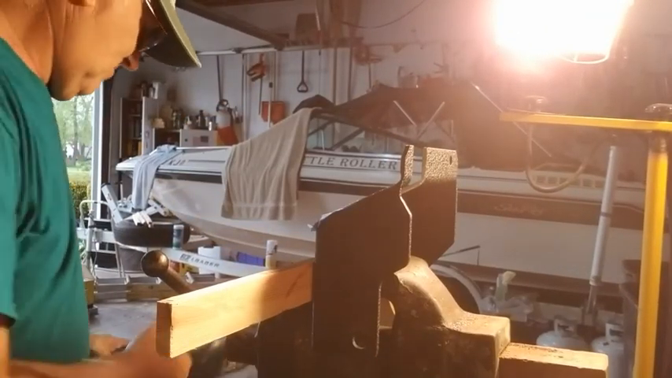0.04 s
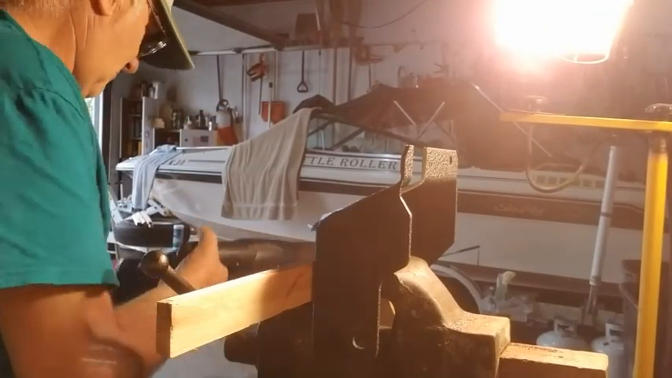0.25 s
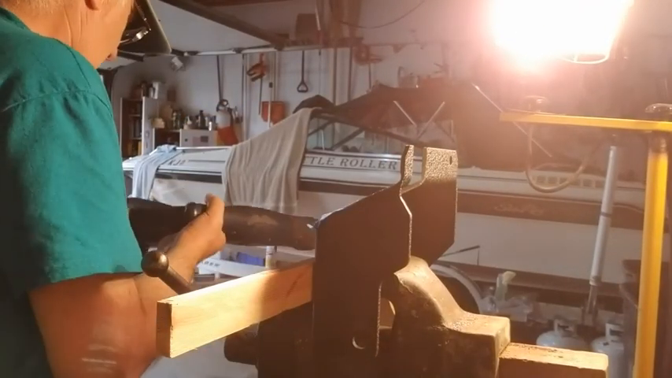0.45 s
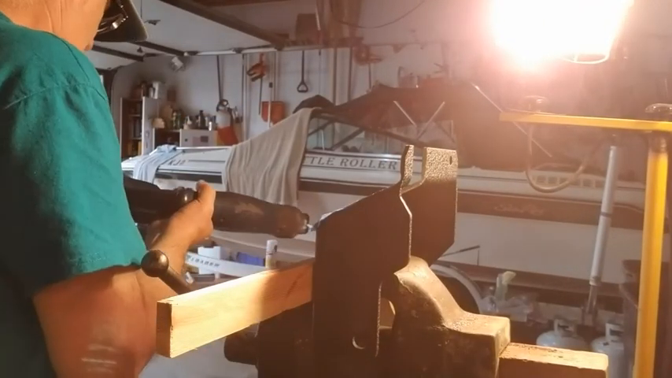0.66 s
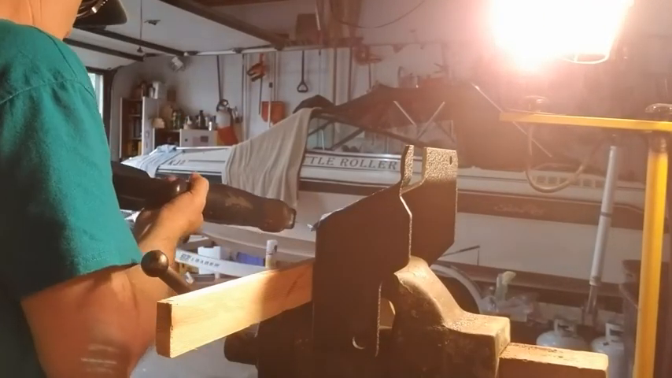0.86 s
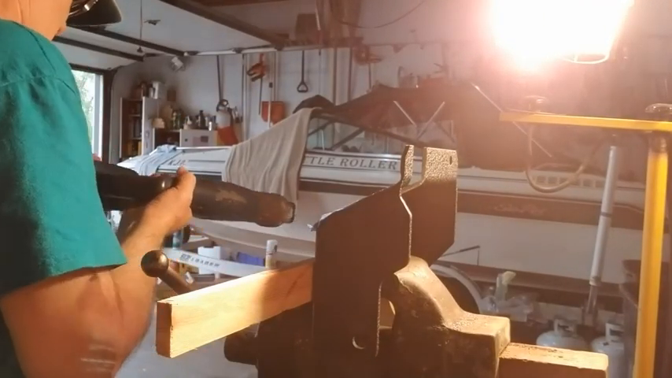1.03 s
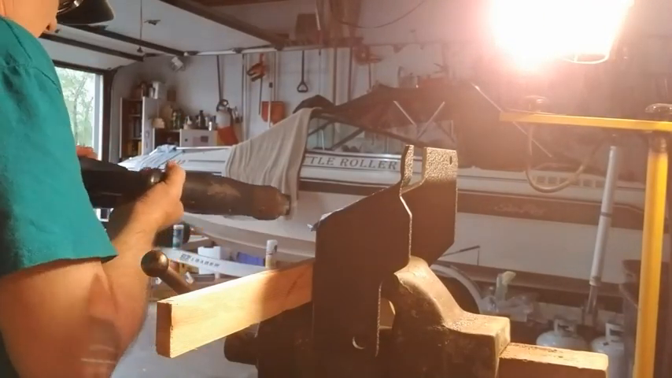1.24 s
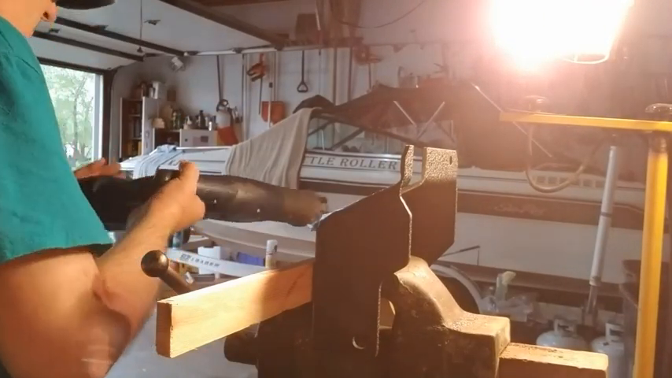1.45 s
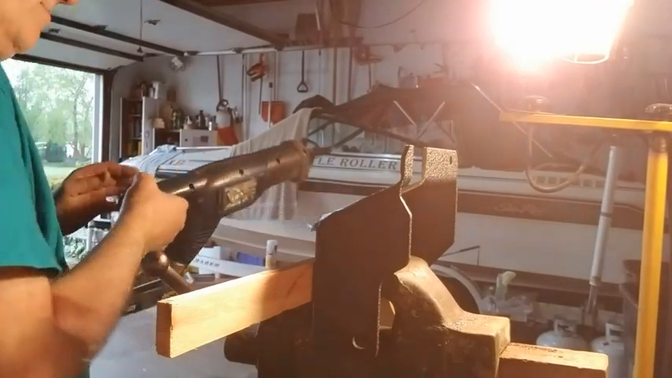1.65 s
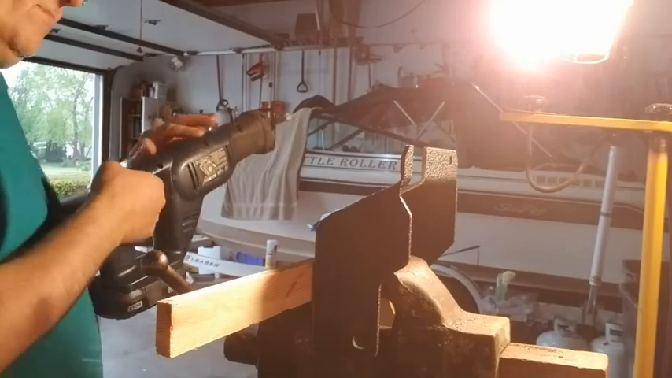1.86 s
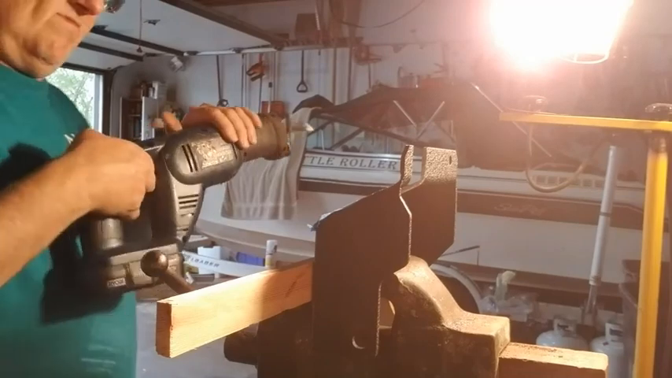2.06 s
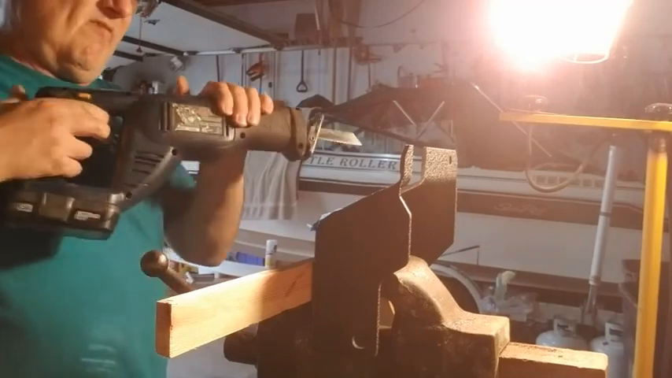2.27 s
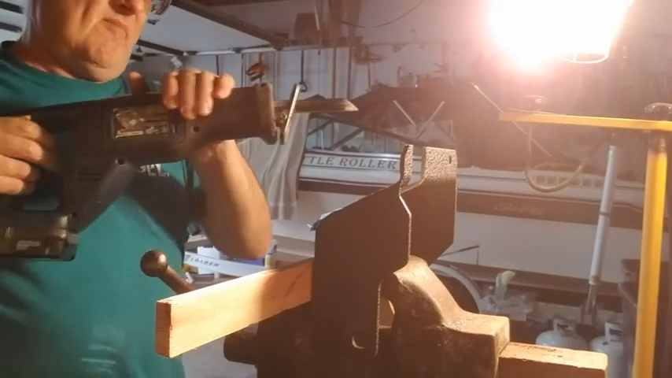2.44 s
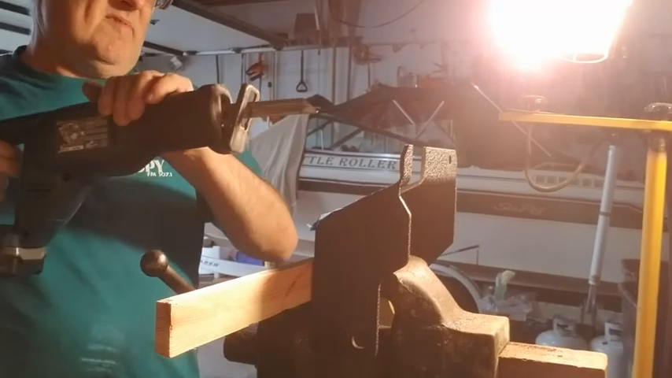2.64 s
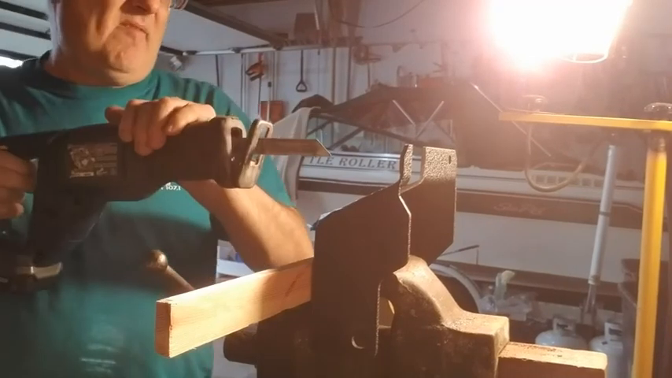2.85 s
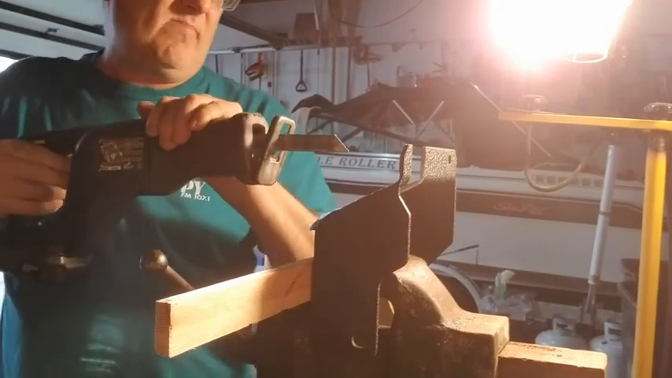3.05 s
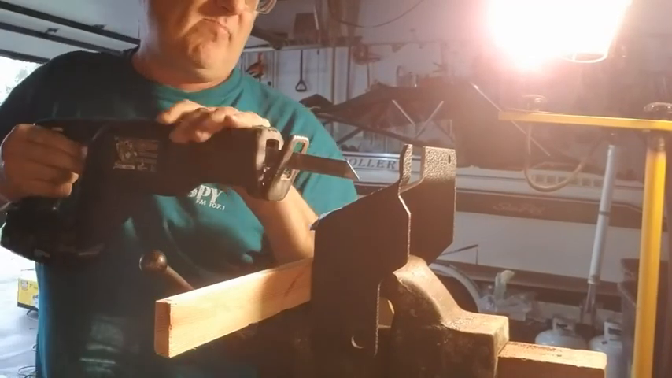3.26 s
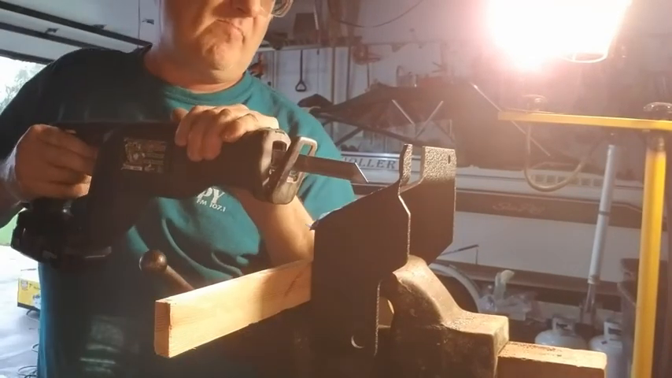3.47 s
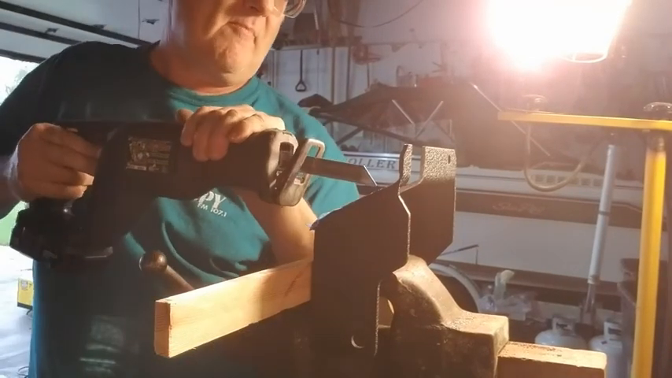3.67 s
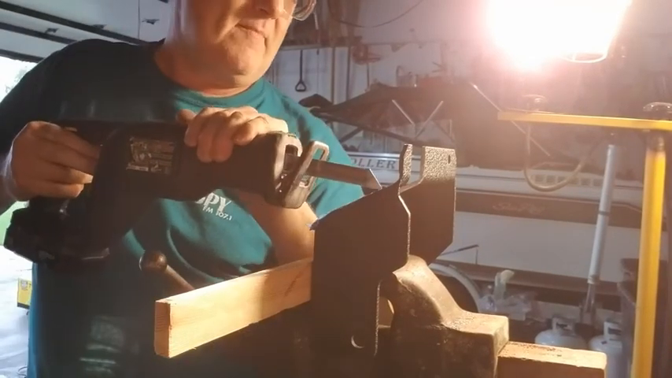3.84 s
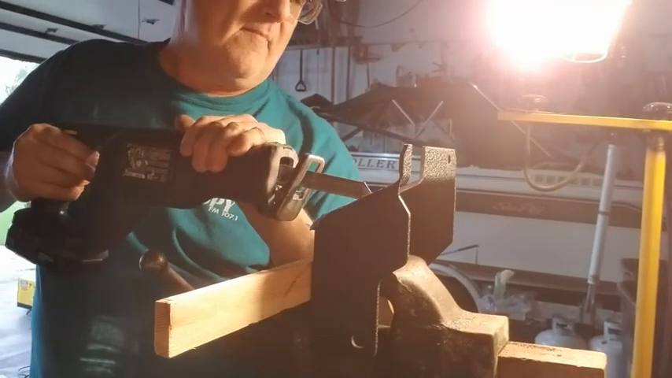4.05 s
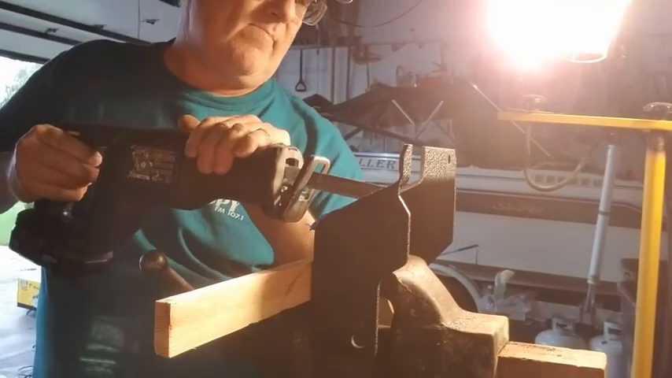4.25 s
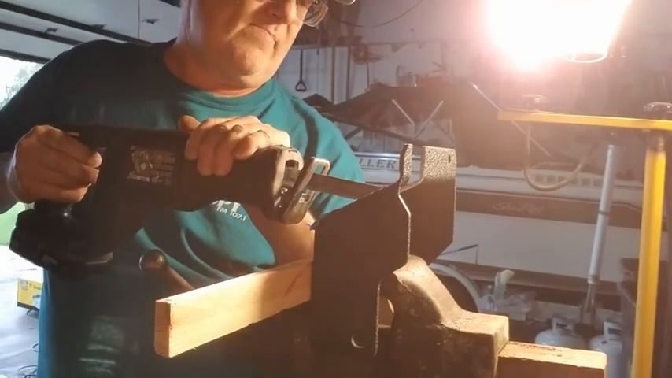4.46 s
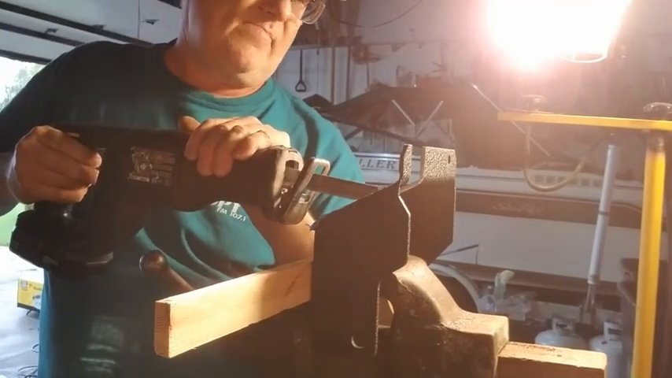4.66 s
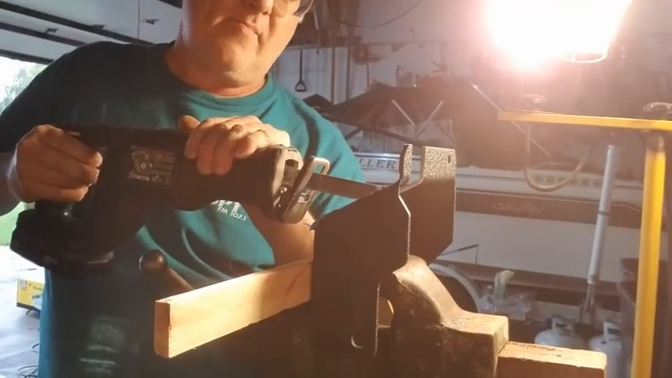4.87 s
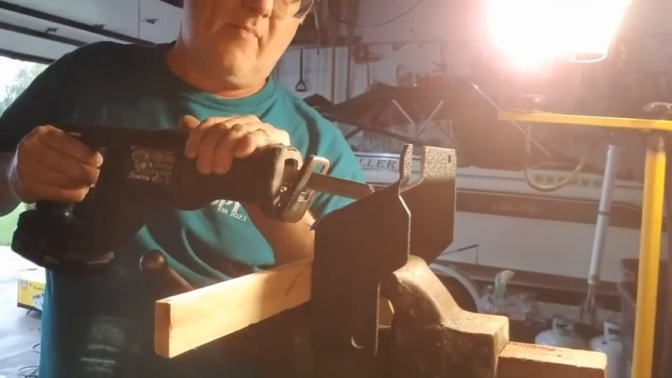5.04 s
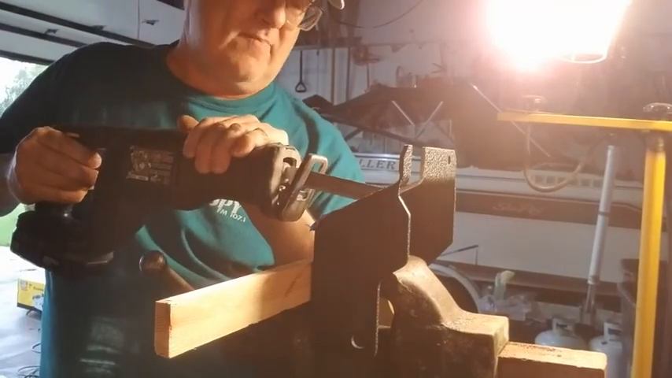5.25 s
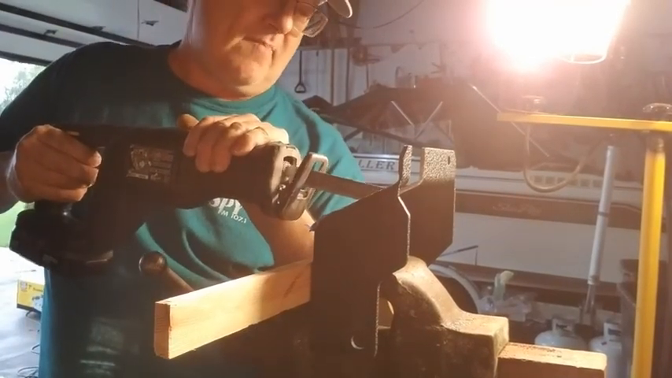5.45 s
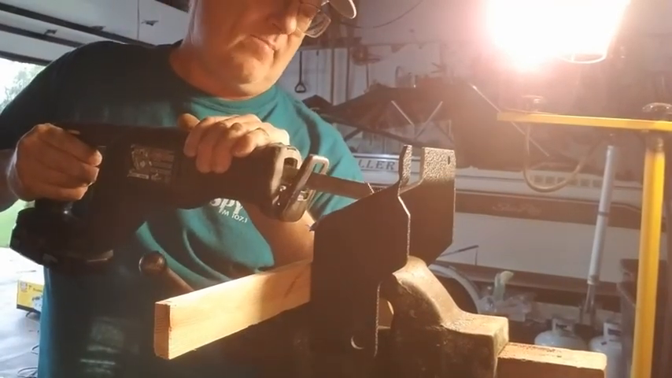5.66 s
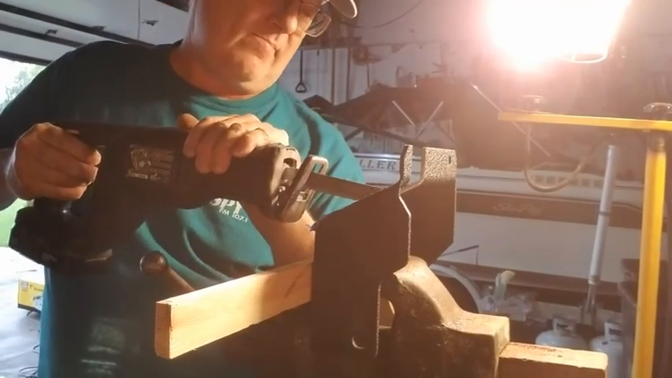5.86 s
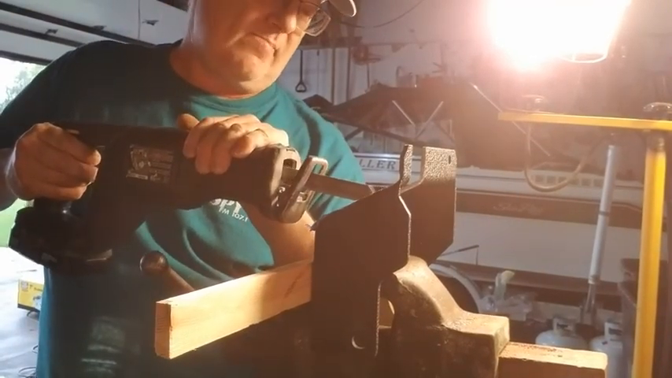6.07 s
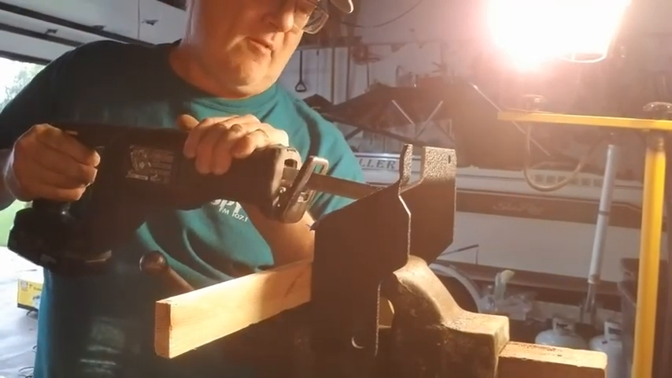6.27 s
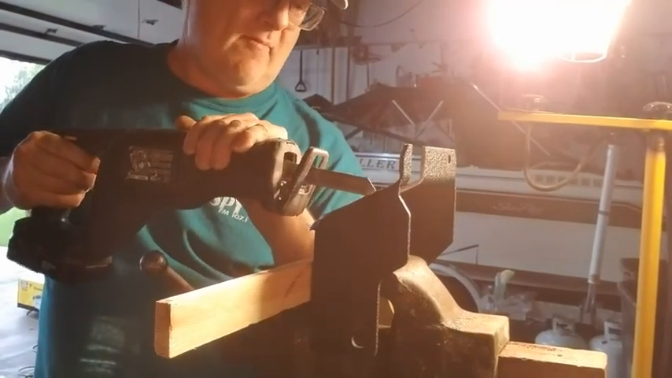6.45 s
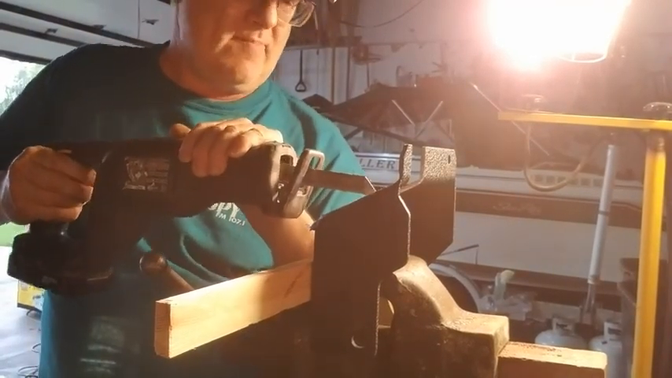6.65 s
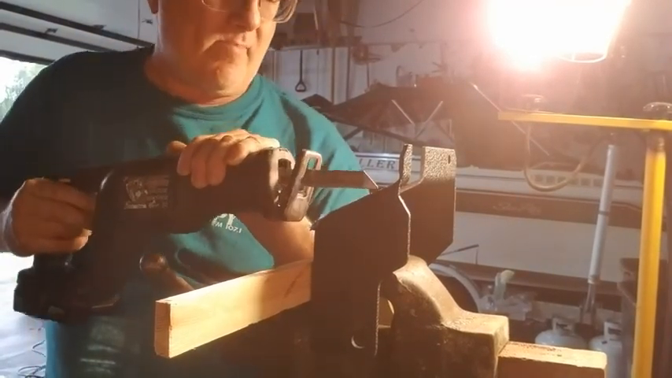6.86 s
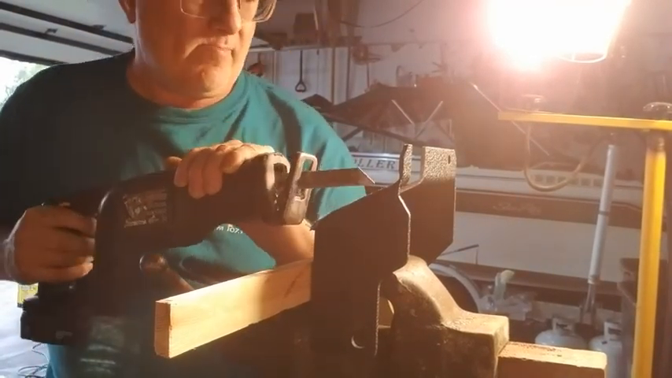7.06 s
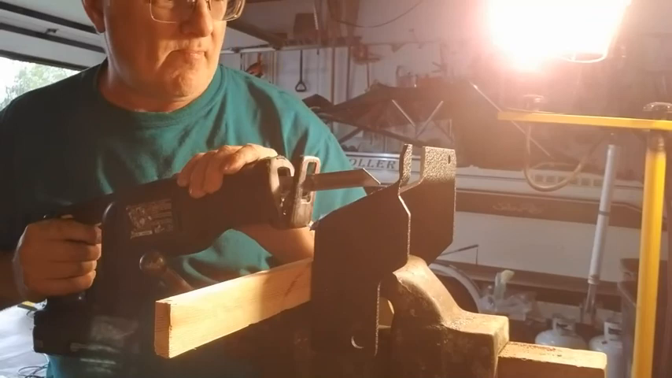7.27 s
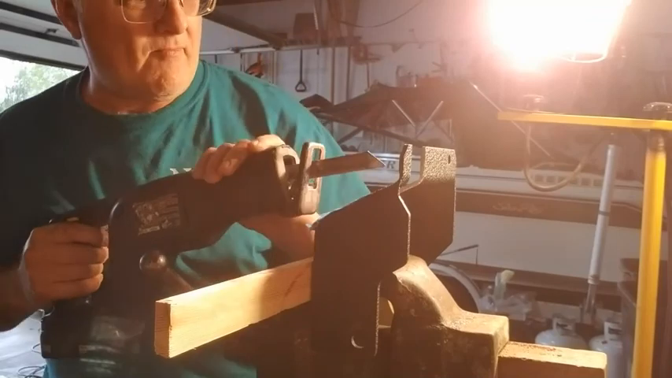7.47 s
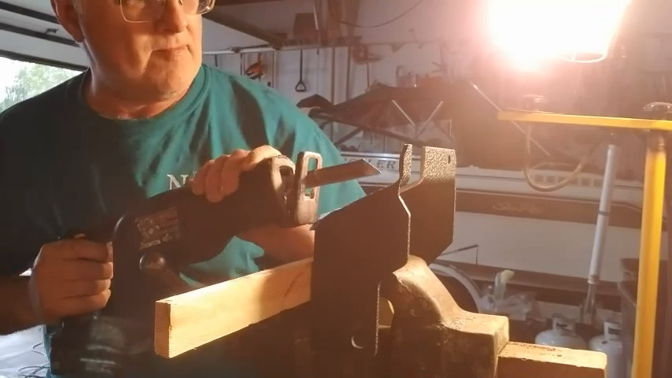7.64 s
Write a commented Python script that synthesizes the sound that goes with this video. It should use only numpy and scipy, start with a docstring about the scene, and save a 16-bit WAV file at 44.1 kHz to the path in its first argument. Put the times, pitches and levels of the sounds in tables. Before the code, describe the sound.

Close stereo sound of a cordless reciprocating saw in a moderately live garage. First come plastic clunks, skin and cloth rubs, and a sharp double snap of the battery catch. A quieter pause holds soft grip noises. The saw starts under strain, clattering at both stroke ends while its blade skates over clamped steel, making it sing unevenly. The motor brakes quickly; the plate rings out, with a few faint taps over low room rumble.

```python
"""In a garage a battery pack is slid onto a cordless reciprocating saw and latched, and the saw is lifted
to a steel plate in a vise. It runs for two seconds: the drive knocks at both ends of each stroke, the
teeth skate over the edge and the plate sings. Hands rustle and tick on the plastic before and after.
Knocks strike damped resonances, scrapes and rustles are shaped noise, the singing plate is two sines."""
import sys
import numpy as np
from scipy import signal
from scipy.fft import rfft, irfft
from scipy.io import wavfile

SR = 44100
rng = np.random.default_rng(int(sys.argv[2]) if len(sys.argv) > 2 else 0)


def to_wav(sig):
    """Store sig (one row per channel, or 1-D mono) as 16-bit WAV at the path in sys.argv[1].

    Samples outside -1..1 are clipped; the rate is SR.
    """
    pcm = np.clip(np.atleast_2d(sig), -1, 1) * 32767
    pcm = np.round(pcm).astype(np.int16)
    wavfile.write(sys.argv[1], SR, pcm.T)  # frames by channels


N = 340011
T = np.arange(N) / SR  # seconds

# Levels throughout are those going into the mix; spectra and resonances are balanced among themselves.

# Crank position. Each row: time in seconds, full back-and-forth strokes completed.
CRANK = [(4.2972, 0), (4.3845, 1), (4.5485, 3), (4.8629, 7), (5.1742, 11), (6.1954, 24), (6.397, 26.5)]
# How hard the teeth bear on the steel. Each row: time in seconds, level in dB.
BITE = [(4.28, -63), (4.39, -39.5), (4.57, -43.5), (4.68, -35.5), (4.82, -45), (4.85, -44), (5.13, -58),
        (5.24, -41.5), (5.37, -54), (5.42, -64), (5.47, -41.5), (5.55, -46), (5.78, -42.5), (5.86, -52.5),
        (5.97, -47.5), (6.11, -54), (6.31, -38), (6.42, -52)]

# Resonances of the steel plate, gearcase, blade and plastic housing, the heavy grip with its battery, the
# gearcase and vents under the running motor, and the battery case (low modes).
# Each row: frequency in Hz, width in Hz, level in dB.
PLATE = [(508, 23, -9.5), (655, 5.8, -6.5), (1265, 9.1, -10), (1447, 8.8, 6.5), (2448, 9.3, 3.5),
         (2738, 13, 2), (4830, 18, -5.5), (6300, 16, -15), (15300, 12, -34)]
GEARCASE = [(135, 110, -19.5), (354, 150, -6), (535, 165, 0), (653, 135, 1.5), (1133, 31, -4.5),
            (1278, 150, -12), (1460, 100, -2.5), (1781, 43, -5.5)]
BLADE = [(5690, 83, 4.5), (8910, 90, 5.5), (10060, 90, -4.5), (11200, 130, -13.5), (12300, 190, -22),
         (13200, 170, 6), (14200, 36, 4.5), (15800, 60, -16), (15440, 700, 8.5)]
HOUSING = [(915, 89, -1.5), (1270, 98, -0.5), (1472, 88, 0), (1676, 330, -0.5), (2077, 140, -0.5),
           (2390, 170, -8.5)]
GRIP = [(367, 140, -9), (535, 116, 0), (640, 100, 2), (785, 62, 4), (1018, 200, -4), (1277, 110, -5),
        (1466, 83, -1)]
CASING = [(549, 36, 11), (645, 57, -9), (967, 76, 4), (1240, 25, -16), (1640, 70, -2), (3000, 120, -30),
          (3400, 110, -2)]
PACK = [(127, 35, -8), (259, 38, -12.5), (369, 39, 3.5), (471, 32, -3)]

# Spectra of loose parts, gears and fan, scraping teeth, the battery latch, clicks on plastic and their top
# end, sliding cloth and skin, their airy hiss, still air, and the low rumble.
# Each row: frequency in Hz, density in dB per Hz.
RATTLE = [(30, -7), (90, -17), (300, -4.5), (620, -3.5), (900, -3.5), (1500, 2.5), (2100, -8), (3300, -4),
          (4500, -13), (7300, -21.5), (9200, -16), (12000, -10.5), (15300, -10), (17000, -26)]
WHIRR = [(30, -40), (140, -22), (300, -10), (550, 4), (950, 6), (1700, -3), (2100, -3.5), (3300, -4.5),
         (4500, -16), (7000, -23.5), (10000, -19), (15000, -14.5)]
SCRAPE = [(100, -6), (300, 9.5), (700, 6.5), (1500, -1.5), (2000, -6), (3200, -2.5), (5000, -1),
          (7300, -14), (10000, -23), (15000, -4)]
LATCH = [(50, -33.5), (130, -14.5), (230, -8.5), (350, -16), (500, -6), (880, 0.5), (1300, -0.5),
         (1900, -3), (2500, -4.5), (4000, -5), (5600, -9), (7500, -15.5), (11000, -9), (15500, -9.5)]
TICK = [(500, -29), (1500, -7), (2700, 1), (4200, -2.5), (6000, -5.5), (8000, -18), (15000, -35.5)]
SPARKLE = [(2000, -47), (6000, -24), (9000, 4), (12000, 9), (15500, 6)]
CLOTH = [(100, -10.5), (300, -11), (550, 1.5), (850, 4), (1600, 0.5), (2800, -3), (5000, -14.5),
         (8000, -40), (15000, -11.5)]
HISS = [(1000, -13), (3000, 6), (5000, 4), (7700, -2.5), (10000, 3), (12500, 5.5), (15500, 0.5)]
AIR = [(15, -37), (25, -6), (82, -3), (141, -6.5), (309, -17.5), (516, -17), (775, -11), (962, -20),
       (4030, -29.5), (5140, -30), (7710, -40), (11600, -26), (16000, -24)]
RUMBLE = [(20, -31.5), (45, -0.5), (70, 3.5), (115, 1.5), (170, -8), (300, -11.5), (900, -42.5)]

# Knocks of the housing. Each row: start in seconds, level in dB, thud and click in dB relative to that
# level, base rattle T60 in seconds, which each layer scales.
KNOCKS = [(0.126, -60.5, -10, 2, 0.045), (0.2252, -48.5, -9, -6, 0.03), (0.4841, -41, 3, -3, 0.038),
          (0.628, -54, 4, -2.5, .04), (0.7093, -35.5, -8, -15.5, 0.041), (0.7238, -51.5, 3, -7, 0.055),
          (0.9558, -38, -7.5, -15, .04), (1.1006, -36.5, -11, -10, .05), (1.219, -43.5, -11.5, -14, .06),
          (1.7634, -67, 18, 13, 0.035), (2.6656, -60.5, 15.5, -0.5, 0.042), (2.6932, -54, 5, -0.5, 0.031),
          (2.836, -46, 3.5, -3.5, 0.062), (2.8473, -45, 1.5, -13, 0.055), (2.976, -57.5, 8, -1, 0.026),
          (3.1988, -50.5, -1, -3.5, 0.084), (3.351, -53, 5, -1.5, 0.048), (3.3614, -39, -5, -18, .04),
          (3.4501, -56.5, 2, -8, .04), (3.8104, -58.5, 5, 6.5, 0.048), (3.946, -56.5, -13, 2.5, .031),
          (3.974, -53, -14.5, -1, .029), (6.7175, -62.5, 5.5, 1, .043), (7.225, -55.5, 6, 1, .04),
          (7.4134, -65, 7.5, -8, 0.043), (7.5394, -56, 13, -3, .036)]
# The battery snapping home. Each row: start in seconds, level in dB, rattle T60 in seconds.
SNAPS = [(1.255, -39, 0.027), (1.2595, -19, 0.019), (1.2616, -19.5, 0.0098), (1.269, -28.5, 0.082)]
# The teeth snag and the plate booms. Each row: centre in seconds, level in dB.
SNAGS = [(4.505, -32), (4.73, -36.5), (6.3, -36)]
# Hands and sleeves slide on the saw. Each row: centre in seconds, half length in seconds, rub in dB, hiss in dB.
SLIDES = [(0.116, 0.26, -57.5, -70.5), (0.268, 0.025, -49.5, -65), (0.68, 0.12, -61.5, -70.5),
          (1.108, 0.16, -57, -69), (1.241, 0.0095, -43, -64), (1.5, 0.082, -61.5, -70.5),
          (2.037, 0.33, -70, -72), (2.5, 0.016, -59, -59), (2.642, 0.037, -56.5, -71.5),
          (2.793, 0.085, -60, -63.5), (2.85, 0.53, -57.5, -77), (2.96, 0.03, -52.5, -60),
          (3.326, 0.056, -56, -62), (3.84, 0.33, -62, -96), (4.01, 0.027, -60, -64.5),
          (7.192, 0.023, -61, -68), (7.405, 0.015, -67, -82.5), (7.534, 0.0062, -53, -90),
          (7.694, 0.037, -70, -81)]
# Swell of the low rumble. Each row: time in seconds, level in dB.
RUMBLE_DB = [(0, -59), (1.1, -59), (1.55, -65), (2.3, -63), (2.7, -61), (4.2, -61.5), (6.6, -72),
             (7.2, -77), (7.71, -89)]

# Decay of the garage, then of the bench reflections. Each row: frequency in Hz, T60 in seconds.
GARAGE_T60_S = [(125, 0.52), (500, 0.57), (2000, 0.47), (5000, 0.4), (10000, 0.34), (16000, 0.27)]
BENCH_T60_S = [(300, 0.13), (3000, 0.036), (12000, 0.066)]
# Balance of the two microphones. Each row: frequency in Hz, left minus right in dB.
LEFT_DB = [(60, 1.5), (200, 1), (700, 1.5), (1300, 3), (2400, 5), (4400, 3.5), (8000, 7), (14000, 0.5)]

RUMBLE_WANDER_DB = -0.5
GRIP_RUB_DB, GRIP_HISS_DB = -78, -84  # the faint creep of a steady grip
SPARKLE_GROWTH = 1.4  # dB of sparkle for each dB of click
# how much of a knock reaches the walls while the saw is held low, and once it is raised near the microphones
RAISED_S, LOW_ROOM_DB, RAISED_ROOM_DB = 1.6, -1, -6
PACK_SEATS_S, PACK_DB = 0.009, -18  # the pack's weight lands just after the stop
# the trigger is held once; the saw strains at first, then settles
TRIGGER_ON_S, TRIGGER_OFF_S, SETTLE_S = 4.243, 6.4, 0.62
SPIN_UP_DB_PER_S, BRAKE_DB_PER_S = 947, 800.5
# settled levels of the motor and of the knocks on each stroke, and what the first strain adds
MOTOR_DB, MOTOR_STRAIN_DB = -36.5, 2.5
PULL_DB, RETURN_DB, KNOCK_STRAIN_DB = -23, -28, 4.5
STROKE_SCATTER_DB = 1.0
RETURN_EARLY_S = 0.00205  # the return stroke is a little quicker than the pull
# the gear mesh whines upward as the motor spins up, and sinks into the whirr under load
GEAR_HZ, GEAR_DB, GEAR_START_S, SPIN_UP_S, GEAR_FADE_S = 1000, -5, 4.215, 0.02, 0.06
# the scrape swells with the bite a moment before the plate answers, and dies as the blade lifts
SCRAPE_DB, SCRAPE_GROWTH, SCRAPE_LEAD_S, LIFT_DB_PER_S = -33.5, 1.3, 0.017, 251
# the plate's two tones: level at a firm bite, and dB gained for each dB of bite
FIRM_BITE_DB = -40.5
SQUEAL_HZ, SQUEAL_DB, SQUEAL_GROWTH = 2276.3, -41, 1.32
FLEX_HZ, FLEX_DB, FLEX_GROWTH = 204.5, -47, 0.82
SNAG_HALF_S = 0.013
# the blade lifts off and leaves the plate ringing
LIFT_S, FREE_RING_DB, FREE_T60_S = 6.33, -44.5, 0.67
TOP_HZ = 15900


def undb(db):
    """Decibels to gain."""
    return 10 ** (np.asarray(db) / 20)


def unit(x):
    """Scale to rms 1."""
    return x / np.sqrt(np.mean(x ** 2))


def fader(rows, lead_s=0):
    """Gain along a dB curve, read a little ahead if wanted; silent outside it."""
    s, db = np.transpose(rows)
    return undb(np.interp(T + lead_s, s, db, left=-200, right=-200))


def across(points, hz):
    """Read (Hz, value) points on a log-frequency axis."""
    points = np.array(points)
    return np.interp(np.log(hz + 1), np.log(points[:, 0]), points[:, 1])


def through(x, response):
    """Pass a sound through a response of unit energy, one for both channels or one for each."""
    response = np.atleast_2d(response)
    response = response / np.linalg.norm(response, axis=1, keepdims=True)
    return signal.oaconvolve(np.atleast_2d(x), response, axes=1)[:, :N]


def colour(x, points, size=4096):
    """Filter to the given spectrum with minimum phase, so that attacks stay sharp."""
    gain = undb(across(points, np.fft.rfftfreq(size, 1 / SR)))
    cepstrum = irfft(np.log(gain))
    # folding the cepstrum onto positive times makes the filter causal
    cepstrum[1:size // 2] *= 2
    cepstrum[size // 2 + 1:] = 0
    return through(x, irfft(np.exp(rfft(cepstrum))))


def ring(x, modes):
    """Drive a set of damped resonances; a wider one dies sooner."""
    t = T[:SR // 2]
    response = 0
    for k, (hz, width, db) in enumerate(modes):
        strength = (-1) ** k * undb(db) * width
        response = response + strength * np.exp(-np.pi * width * t) * np.sin(2 * np.pi * hz * t)
    return through(x, response)


def walk(rate):
    """Random wander with a spread near 1, drawn as lines between `rate` random points a second."""
    knots = rng.standard_normal(N // 16)
    return np.interp(T * rate, np.arange(len(knots)), knots)


def swell(s, half_s):
    """A smooth rise and fall around one moment."""
    return np.exp(-((T - s) / half_s) ** 2)


def diffuse(apart_hz=1300, alike=0.6, size=N):
    """A large radiating body at two close microphones: noise alike in the bass, unrelated in the treble."""
    mid, side = rng.standard_normal((2, size))
    # the difference between the microphones fades towards the bass
    low_side = signal.lfilter(*signal.butter(1, apart_hz, fs=SR), side)
    side = side - np.sqrt(np.clip(alike, 0, 1)) * .8 * low_side
    return unit(np.array([mid + side, mid - side]))


def grit(spread_db):
    """Noise made of tiny contacts of unequal size."""
    return unit(diffuse() * undb(spread_db * walk(1500)))


def blows(times, dbs, t60s, size=8192):
    """Dying envelopes of blows; the level of each is that of its energy spread over 4 ms."""
    power = np.zeros(N + size)
    for s, db, t60 in zip(*np.broadcast_arrays(times, dbs, t60s)):
        fall = np.exp(-2 * np.log(1000) * T[:size] / max(t60, 1 / SR))
        start = int(s * SR)
        power[start:start + size] += fall / fall.sum() * undb(db) ** 2 * .004 * SR
    return np.sqrt(power[:N])


def crank_angle():
    """Crank angle in radians, one turn for each full stroke."""
    s, strokes = np.transpose(CRANK)
    return 2 * np.pi * np.interp(T, s, strokes)


def strain(s):
    """Extra effort of the saw: 1 as the trigger is pulled, fading as it settles."""
    return np.exp(-np.maximum(s - TRIGGER_ON_S, 0) / SETTLE_S)


def background():
    """Still air and an uneven low rumble from outside the open door."""
    s, db = np.transpose(RUMBLE_DB)
    level = undb(np.interp(T, s, db) + RUMBLE_WANDER_DB * walk(9.1))
    air = undb(-66.5) * colour(diffuse(), AIR)
    return air + level * colour(diffuse(alike=.75), RUMBLE)


def hands():
    """Skin and cloth slide over the saw in small uneven steps, swelling at each change of grip."""
    rub, hiss = undb(GRIP_RUB_DB), undb(GRIP_HISS_DB)
    for s, half_s, rub_db, hiss_db in SLIDES:
        slide = swell(s, half_s)
        # overlapping slides add as powers
        rub = np.hypot(rub, undb(rub_db) * slide)
        hiss = np.hypot(hiss, undb(hiss_db) * slide)
    steps = undb(0.75 * walk(50))
    cloth = colour(grit(4.6) * rub * steps, CLOTH)
    airy = colour(grit(2.8) * hiss * steps, HISS)
    return undb(-2.5) * cloth + undb(2.0) * airy


def knocks():
    """Hard contacts ring the plastic housing, soft ones the grip; returns the near sound and the walls' share."""
    s, db, thud_db, click_db, t60 = np.transpose(KNOCKS)
    contact = diffuse(apart_hz=2200)
    # the full push comes just after the first touch, amid a little scraping
    hard = undb(-6.5) * blows(s + 0.00206, db, 0) + undb(-3) * contact * blows(s, db, t60 * 0.32)
    soft = undb(-6.5) * blows(s + 0.0019, db + thud_db, 0)
    soft = soft + undb(-2) * contact * blows(s, db + thud_db, t60 * .5)
    tick = colour(contact * blows(s, db + click_db, t60 * 1.6), TICK)
    sparkle = colour(contact * blows(s, db + SPARKLE_GROWTH * click_db, t60), SPARKLE)
    near = undb(2.0) * ring(hard, HOUSING) + undb(1.5) * ring(soft, GRIP)
    near = near + undb(3.0) * tick + undb(4.5) * sparkle
    return near, near * undb(np.where(T < RAISED_S, LOW_ROOM_DB, RAISED_ROOM_DB))


def latch():
    """The battery hits its stop with a sharp crack and a hollow thump, amid the snap and rattle of the catch."""
    s, db, t60 = np.transpose(SNAPS)
    stop_s = s[db.argmax()]
    stop = blows([stop_s], db.max(), 0)
    seated = blows([stop_s + PACK_SEATS_S], db.max(), 0)
    crack = colour(undb(-4) * stop + diffuse() * blows(s, db, t60), LATCH)
    return crack + undb(PACK_DB) * ring(seated, PACK)


def motor():
    """Gear teeth and fan whirr in the gearcase, loudest as they speed the blade up after each reversal."""
    angle = crank_angle()
    load = undb(1.5 * np.sin(2 * angle) + 0.34 * np.sin(angle))
    spin_up_db = SPIN_UP_DB_PER_S * np.maximum(TRIGGER_ON_S - T, 0)
    brake_db = BRAKE_DB_PER_S * np.maximum(T - TRIGGER_OFF_S, 0)
    effort = load * undb(MOTOR_DB + MOTOR_STRAIN_DB * strain(T) - spin_up_db - brake_db)
    turning = grit(3) * effort
    # gear speed as a share of GEAR_HZ
    speed = 1 - np.exp(-np.maximum(T - GEAR_START_S, 0) / SPIN_UP_S)
    speed = speed * (1 + 0.018 * walk(200))
    fade = np.exp(-np.maximum(T - TRIGGER_ON_S, 0) / GEAR_FADE_S)
    whine = np.sin(2 * np.pi * GEAR_HZ * np.cumsum(speed) / SR) * effort * fade
    return colour(turning, WHIRR) + undb(-6.0) * ring(turning, CASING) + undb(GEAR_DB) * whine


def teeth():
    """The teeth scrape hardest in mid-stroke, where the blade is fastest, and set the plate ringing."""
    angle = crank_angle()
    bite = fader(BITE, SCRAPE_LEAD_S) / undb(FIRM_BITE_DB)
    level = undb(SCRAPE_DB - LIFT_DB_PER_S * np.maximum(T - LIFT_S, 0)) * bite ** SCRAPE_GROWTH
    blade_speed = 0.32 + 1.16 * np.abs(np.sin(angle))
    # they dig in on the pull and skate on the return
    pressure = undb(1.5 * np.sin(angle) + 2 * walk(90))
    contact = grit(4.0) * blade_speed * pressure * level
    return undb(-3) * colour(contact, SCRAPE) + undb(-5.0) * ring(contact, PLATE)


def plate():
    """Stick and slip lock onto two modes of the plate, a squeal and a low flex, louder the harder the bite."""
    bite = fader(BITE) / undb(FIRM_BITE_DB)
    touching = bite / bite.max()
    free = (T > LIFT_S) * undb(FREE_RING_DB) * np.exp(-np.log(1000) * np.abs(T - LIFT_S) / FREE_T60_S)
    driven = undb(SQUEAL_DB) * bite ** SQUEAL_GROWTH * undb(3.1 * walk(35))
    booms = sum(undb(db) * swell(s, SNAG_HALF_S) for s, db in SNAGS)
    bending = undb(FLEX_DB) * bite ** FLEX_GROWTH * undb(3.2 * walk(30)) + booms
    # the bite jostles the phase of the squeal, so the free ring is steady
    squeal = np.sin(2 * np.pi * SQUEAL_HZ * T + touching * walk(46)) * np.maximum(driven, free)
    flex = np.sin(2 * np.pi * FLEX_HZ * T + 1.1 * walk(28)) * bending
    return undb(7.0) * squeal + undb(1.5) * flex


def drive():
    """Crank slack closes at both ends of a stroke: the gearcase thumps and rebounds, parts rattle, the blade zings."""
    s, strokes = np.transpose(CRANK)
    turns = np.arange(2 * strokes[-1] + 1) / 2  # both ends of every stroke
    early, size, rebound = rng.standard_normal((len(turns), 3)).T
    pulling = turns % 1 == 0
    times = np.interp(turns, strokes, s) + .0005 * early - np.where(pulling, 0, RETURN_EARLY_S)
    dbs = np.where(pulling, PULL_DB, RETURN_DB) + KNOCK_STRAIN_DB * strain(times) + STROKE_SCATTER_DB * size
    rebound_times = times + 0.00509 * np.exp(0.305 * rebound)
    slap = blows(times + 0.001, dbs, 0) + undb(-6.5) * blows(rebound_times, dbs, 0)
    thump = ring(slap, GEARCASE)
    rattle = colour(diffuse() * blows(times, dbs, 0.1), RATTLE)
    zing = ring(diffuse() * blows(times, dbs, 0.051), BLADE)
    return undb(-2.5) * thump + undb(2.0) * rattle + undb(-4.5) * zing


def saw_body():
    """Drive, motor and teeth together; a tool this small radiates no deep bass."""
    high_pass = signal.butter(2, 65, "high", fs=SR, output="sos")
    return signal.sosfilt(high_pass, drive() + motor() + teeth())


def echoes(x, t60s, delay_s, size=32768):
    """Dense reflections that start after a delay and die at their own rate in each band."""
    hz, t = np.fft.rfftfreq(size, 1 / SR), T[:size]
    spectrum = rfft(diffuse(size=size))
    response = 0
    for centre, t60 in t60s:
        # each band peaks at its own centre and crossfades into its neighbours
        band = across([(f, float(f == centre)) for f, _ in t60s], hz)
        response = response + irfft(spectrum * band) * np.exp(-np.log(1000) * t / t60)
    return through(x, response * np.clip(t / delay_s - 1, 0, 1))


def scene():
    """Saw and hands close by, a little earlier on the right, with quick bench reflections and the garage's tail."""
    saw, snap, rustle = saw_body(), latch(), hands()
    knock, knock_out = knocks()
    left, right = saw + snap + rustle + knock
    direct = np.array([np.roll(left, 3), right])  # left lags by 3 samples
    to_walls = undb(-10) * saw + snap + undb(-2.5) * rustle + knock_out
    garage = echoes(to_walls, GARAGE_T60_S, 0.002)
    bench = echoes(saw + snap + knock, BENCH_T60_S, 0.002)
    return direct + undb(-11.0) * bench + garage + plate() + background()


def record(dry, size=256):
    """The left microphone is brighter through most of the treble; a steep low-pass cuts off the top."""
    tilt_db = across(LEFT_DB, np.fft.rfftfreq(size, 1 / SR))
    ports = []
    # half of the tilt lifts the left, half lowers the right
    for x, sign in zip(dry, (1, -1)):
        response = np.fft.fftshift(irfft(undb(sign * tilt_db / 2)))
        ports.append(signal.oaconvolve(x, response)[size // 2:][:N])
    low_pass = signal.ellip(10, .2, 70, TOP_HZ, fs=SR, output="sos")
    return signal.sosfilt(low_pass, ports)


dry = scene()
out = record(dry)
to_wav(out)
```